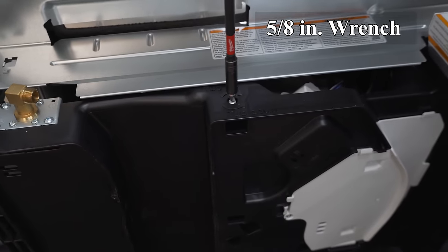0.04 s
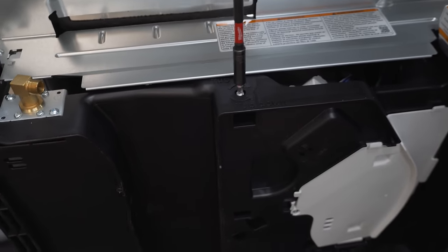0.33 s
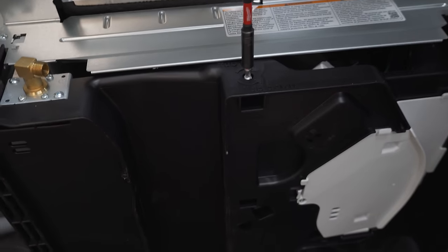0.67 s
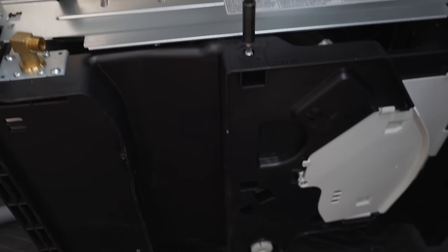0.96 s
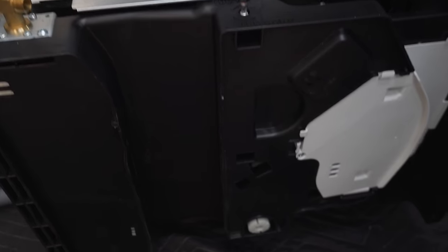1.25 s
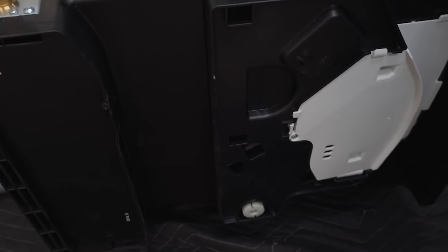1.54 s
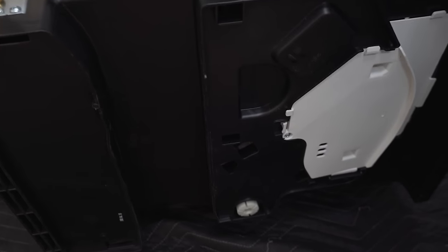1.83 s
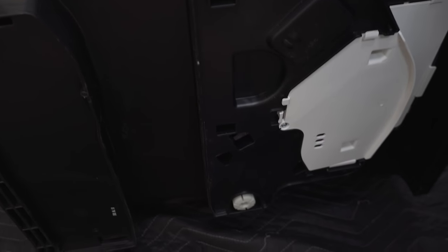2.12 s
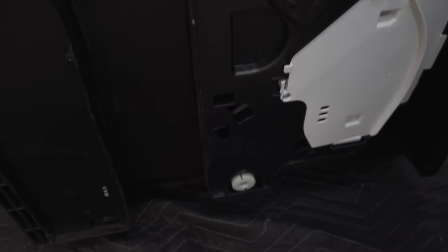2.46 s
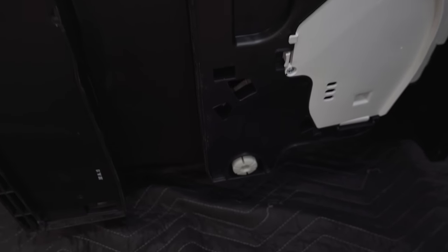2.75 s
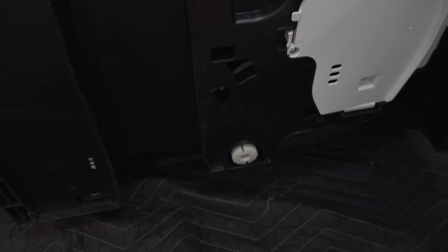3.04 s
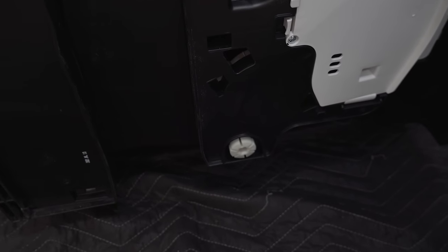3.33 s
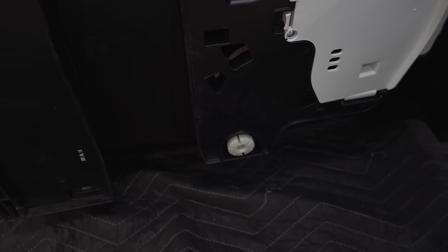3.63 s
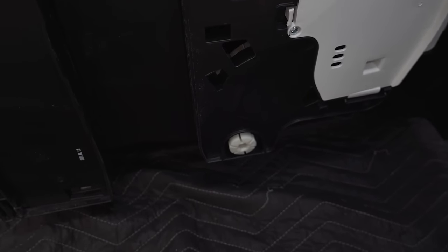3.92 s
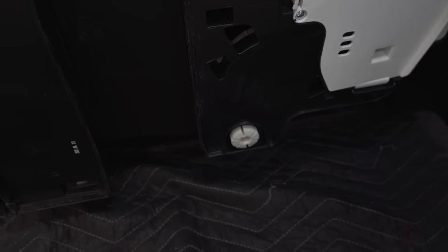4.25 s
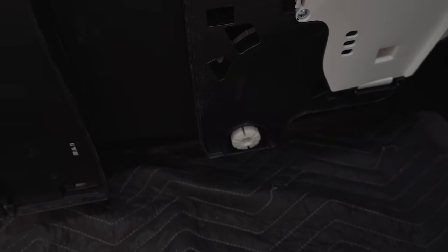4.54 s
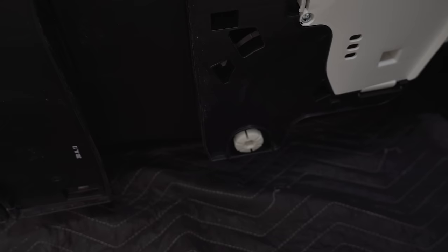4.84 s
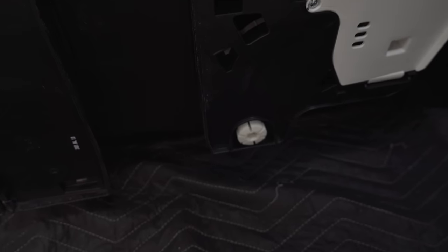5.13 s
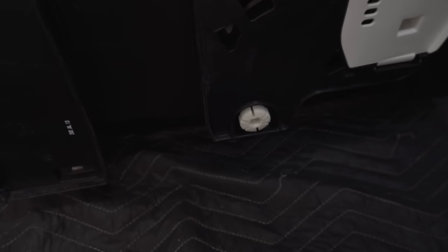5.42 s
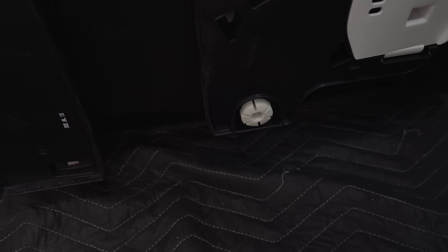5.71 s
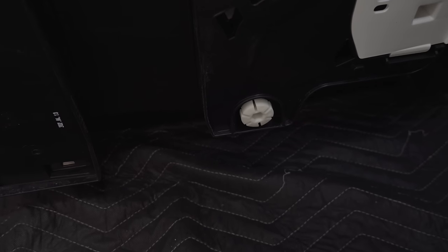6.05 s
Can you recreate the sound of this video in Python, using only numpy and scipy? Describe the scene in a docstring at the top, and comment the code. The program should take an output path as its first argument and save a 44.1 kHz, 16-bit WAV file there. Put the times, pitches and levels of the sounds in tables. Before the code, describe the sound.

Irregular plastic knocks, clacks and small steel ticks as a screwdriver turns a stiff adjusting screw, gears twice slipping with a rasp, over low hum.

```python
"""In a quiet, humming room, a driver turns the levelling screw of a dishwasher, close by.
Impacts excite resonators: the steel bit ticks in the screw head and its shaft rings, while the
plastic drive knocks, ratchets and clacks as it binds and slips. Twice the gears jump and spin in a
rasping run of friction noise. The hollow base and the cabinet ring on after the blows."""
import sys
import numpy as np
from scipy import signal
from scipy.fft import rfft, irfft, next_fast_len
from scipy.io import wavfile
from scipy.ndimage import uniform_filter1d

SR = 44100
rng = np.random.default_rng(int(sys.argv[2]) if len(sys.argv) > 2 else 0)


def wrap_up_sound(samples):
    """Save the sound to the file named by the first command line argument, as 16-bit audio."""
    columns = np.atleast_2d(samples).T
    # keep every value between -1 and 1, then stretch to whole-number steps
    tamed = np.clip(columns, -1, 1)
    steps = np.round(tamed * 32767).astype(np.int16)
    wavfile.write(sys.argv[1], SR, steps)


N = 272538
TIME = np.arange(N) / SR
AGE = TIME[:SR * 3 // 4]   # time since a contact

# Levels are relative within each source.
# the shaft takes up its play: t/s, level/dB, judder length/s, hardness/dB
KNOCKS = [(0.127, -26.5, 0.0066, 0), (1.02, -9.5, 0.057, 7), (1.676, -6.5, .115, 12),
          (1.98, -18.5, .035, -20), (2.224, -21.5, .005, 9), (2.665, -5, .016, 13), (4.106, -21.5, .005, 9),
          (4.704, -22.5, .005, 11), (5.242, -12.5, .005, -31)]
# the drive slips under load: t/s, level/dB, rise/s, treble/dB, cabinet ring/dB
CLACKS = [(0.71, -31, 0.0021, 0, -11), (3.242, -24, 0.0061, 1, -4.5), (3.256, -15.5, 0.0043, -2, -10.5),
          (3.608, -29, 0.0022, -1, -7.5), (4.245, -23, 0.0018, -23, -8), (4.277, -8.5, 0.0019, -0.5, -13),
          (4.339, -10.5, 0.0033, -2.5, -15.5), (4.444, -18, 0.0018, -8, -18),
          (4.679, -22, 0.0015, 20.5, -13), (4.741, -8.5, 0.0064, -2.5, -10.5),
          (4.766, -10, 0.0028, -3.5, -13), (4.957, -20.5, .0041, -15, -7.5), (5.214, -7.5, 0.0022, 4, -11),
          (5.381, -22.5, 0.0023, -6, -14), (5.424, -6, 0.0033, 1, -9.5), (5.605, -8, 0.0029, -0.5, -6),
          (5.761, -14, 0.0017, -6, -3.5)]
# gear teeth jump: t/s, level/dB, skipping length/s, treble/dB
SNAPS = [(2.695, -1.5, .005, 6), (2.727, -10, .005, 16), (5.816, -7, .005, -18), (5.829, -0.5, .005, 0),
         (5.861, -3, 0.192, 3.5)]
# the gears spin: t/s, time under power/s, bass/dB, middle/dB, rasp/dB
GEAR_RUNS = [(2.675, .18, -20.5, -17, -22.5), (5.771, 0.34, -18.5, -20.5, -29)]
# the bit rattles in the screw head: t/s, length/s, tick/dB, shaft ring/dB
CLINKS = [(0.126, 0.028, -31.5, -44), (0.186, .012, -41, -43.5), (1.019, 0.025, -23.5, -38.5),
          (1.362, 0.031, -26, -38), (1.683, 0.06, -12.5, -36), (1.772, 0.028, -19, -32.5),
          (1.884, 0.033, -15.5, -45), (2.208, 0.023, -16, -30), (2.654, 0.061, -18.5, -32),
          (5.785, 0.022, -9.5, -25.5)]
# the base flexes under hard pushes: t/s, level/dB, f/Hz
THUMPS = [(2.83, -20, 63), (3.255, -19, 165), (4.102, -24, 210), (4.278, -15, 165), (4.346, -16.5, 163),
          (4.698, -14.5, 76), (4.763, -14, 257), (6.059, -13, 49.6), (6.098, -14, 175)]
# slow drift of the background: t/s, rumble/dB, hiss/dB, hum/dB
ROOM_LEVELS = [(0.0, -34.5, -58.5, -36), (1.3, -33.5, -56, -33), (1.8, -32, -54.5, -37.5),
               (2.6, -32.5, -56.5, -34), (3.3, -36.5, -60.5, -38), (4.0, -35.5, -57.5, -37),
               (5.2, -31.5, -56.5, -35.5)]
# a single contact: delay/s, gain
ONCE = [(0, 1)]
# resonances of the plastic base: f/Hz, half-width/Hz, strength/dB
BASE_MODES = [(179, 3.7, 8), (294, 28, 3), (333.5, 14, 5), (370, 4.4, 6), (432, 14, 4), (468.4, 42, 3.5),
              (529, 20, 7), (619, 9.2, 7.5), (682, 10, 6.5), (782.7, 18, 10.5), (978, 100, 2),
              (1088, 6, 10), (1295, 2.4, 9), (1480, 11, 9), (1590, 5, -8), (1886, 24, 4.5), (2392, 21, 6),
              (2640, 29, 6)]
# modes of the steel shaft: f/Hz, level/dB, t60/s
SHAFT_MODES = [(5440, -5.5, 0.39), (5410, 1.5, 0.14), (6220, -18, 0.15), (11680, -22, 0.37)]
# spectral envelopes of the sources: f/Hz, density level/dB
KNOCK_SPECTRUM = [(130, -21.5), (220, -16), (320, -0.5), (450, -1), (620, -7), (890, -17.5), (1340, -17.5),
                  (1650, -29.5), (2000, -33), (5000, -52), (11000, -83)]
CLACK_SPECTRUM = [(71, -65), (120, -4.5), (372, 0), (1630, -1.5), (3230, -11.5), (3870, -15.5), (5140, -22),
                  (6290, -31.5), (8520, -33.5), (10400, -44), (15000, -47)]
SNAP_SPECTRUM = [(120, -11), (200, -2), (957, 3), (1950, 1.5), (4750, -11.5), (6350, -23), (8050, -18.5),
                 (8660, -23.5), (15500, -34)]
CABINET_SPECTRUM = [(88, -21), (150, -24.5), (331, 4.5), (525, -5), (991, -4), (1570, -15), (1950, -9),
                    (2860, -21.5), (3400, -21.5), (4720, -30), (15000, -52.5)]
GEAR_SPECTRUM = [(71, -52), (120, -22), (271, -13.5), (335, -2), (400, -11.5), (780, -11), (1950, -12.5),
                 (3300, -14.5), (15500, -48)]
TICK_SPECTRUM = [(530, -5), (900, 2.5), (2280, 1.5), (4900, -9.5), (5450, -7.5), (5990, -12), (9820, -19.5),
                 (11900, -28), (15000, -31)]
RATCHET_SPECTRUM = [(820, -6), (1400, -2), (2000, -1.5), (2290, -7), (4040, -12.5), (5090, -10.5),
                    (6230, -18), (14000, -43)]
RUB_SPECTRUM = [(1500, -19), (4000, 3), (7000, -1), (10000, -6), (15000, -15)]
ROOM_SPECTRUM = [(20, -3), (42, -9), (59, -1.5), (110, -5.5), (160, -4), (225, -1.5), (324, -12),
                 (550, -23.5), (1100, -29), (1700, -30), (3500, -41), (8000, -47.5), (11000, -53.5),
                 (15500, -58)]
# stereo width of the drive and of the room: f/Hz, side re mid/dB
DRIVE_WIDTH = [(60, -42), (110, -30), (200, -22), (380, -18.5), (700, -13), (1290, -10.5), (2380, -7),
               (4400, -6), (8120, -5.5), (15000, -5)]
ROOM_WIDTH = [(60, -44), (110, -38), (200, -27.5), (380, -9.5), (700, -6.5), (1290, -3), (2380, 0.5),
              (4400, 2.5), (8120, -0.5), (15000, 0.5)]


def knocks():
    """Backlash: the shaft knocks as its play closes, then judders on with softer blows."""
    rows = []
    for s, db, length_s, hardness_db in KNOCKS:
        judder = rattle(length_s, per_s=63.8, fade_db=3.5, unevenness=0.65)
        bass_db = -0.28 * hardness_db   # a harder knock has less bass
        rows.append((s, db, bass_db, hardness_db, 0.0032, -8, ONCE))
        rows.append((s, db - 3.5, 0, -2, 0.0033, -6, judder))
    return blows(rows, KNOCK_SPECTRUM, KNOCK_SPECTRUM, tilt_hz=(350, 650, 1600), base_db=-1.5,
                 ring_t60=0.44, ring_tilt_share=0.45, build_s=0.0058, lead_s=0.003027, touch_db=-5)


def clacks():
    """Stick-slip: the drive binds and lets go in single clacks; the harder ones are thinner."""
    pivot_db, thinning = -17.5, 0.37   # bass lost per dB above the pivot
    rows = [(s, db, thinning * (pivot_db - db), treble_db, rise_s, ring_db, ONCE)
            for s, db, rise_s, treble_db, ring_db in CLACKS]
    return blows(rows, CLACK_SPECTRUM, CABINET_SPECTRUM, tilt_hz=(450, 1500, 6000), base_db=-1,
                 ring_t60=0.64, ring_tilt_share=0.79, build_s=0.0014, lead_s=.003, touch_db=-19)


def snaps():
    """Periodic impact: a gear tooth jumps with a snap, then once a turn while the skipping lasts."""
    turns_per_s, bass_db, ring_db = 21.3, 4, -22
    rows = []
    for s, db, length_s, treble_db in SNAPS:
        skips = rattle(length_s, turns_per_s, fade_db=4.5, unevenness=.06)
        rows.append((s, db, bass_db, treble_db, .0019, ring_db, ONCE))
        rows.append((s, db + 0.5, bass_db, treble_db, 0.0026, ring_db, skips))
    return blows(rows, SNAP_SPECTRUM, CABINET_SPECTRUM, tilt_hz=(450, 1500, 6000), base_db=-10,
                 ring_t60=0.9, ring_tilt_share=0.13, build_s=0.0057, lead_s=.011, touch_db=-7.5)


def blows(rows, spectrum, ring_spectrum, tilt_hz, base_db,
          ring_t60, ring_tilt_share, build_s, lead_s, touch_db):
    """Impact excitation: plastic crunches briefly, and the cabinet's dense modes decay as noise."""
    out = np.zeros((2, N))
    ringing = dying(ring_t60) * (1 - np.exp(-AGE / build_s))   # reflections build up in the cabinet
    for s, db, bass_db, treble_db, rise_s, ring_db, contacts in rows:
        contacts = touched(contacts, lead_s, touch_db)
        tilt_db = np.array([bass_db, 0, treble_db])
        rise = np.minimum(AGE / rise_s, 40)
        force = repeated(rise * np.exp(1 - rise), contacts)[:SR // 3]
        crunch = noise(force, side_db=-0.5)
        crunch = coloured(crunch, spectrum, DRIVE_WIDTH, np.c_[tilt_hz, tilt_db], base_db)
        add(out, s - lead_s, from_db(db) * crunch * rms(force) / rms(crunch))
        ring = noise(repeated(ringing, contacts), side_db=5.5)   # reflected sound is wider
        ring_tilt = np.c_[tilt_hz, tilt_db * ring_tilt_share]
        ring = coloured(ring, ring_spectrum, DRIVE_WIDTH, ring_tilt, base_db)
        add(out, s - lead_s, from_db(db + ring_db) * ring)
    return out


def gear_runs(teeth_per_s=170):
    """Modulated friction: uneven tooth pulses shake the base, and the sound dulls as they run down."""
    tooth_phase = np.cumsum(teeth_per_s * (1 + .15 * wander(.01))) / SR % 1
    load = 1 + 0.52 * np.exp(-4 * tooth_phase)
    load *= from_db(0.96 * wander(0.0064))   # no two teeth bite alike
    scrape = coloured(noise(load, side_db=5.5), GEAR_SPECTRUM, DRIVE_WIDTH, base_db=-1)
    body, treble = split(scrape, hz=3630)
    bass, middle = split(body, hz=833)
    rasp, fizz = split(treble, hz=10800)
    gains = np.zeros((3, N))
    for s, length_s, *levels in GEAR_RUNS:
        for gain, db, attack_s in zip(gains, levels, (0.11, 0.067, 0.039)):
            gain += from_db(db) * swell(TIME, s, attack_s, length_s, release_db_per_s=97.5)
    bass_gain, middle_gain, rasp_gain = gains
    fizz_gain = rasp_gain ** 2 / rasp_gain.max()   # the top band fades twice as fast
    return (from_db(1.1) * (bass * bass_gain + middle * middle_gain)
            + from_db(3.5) * rasp * rasp_gain + from_db(-12) * fizz * fizz_gain)


def steel_bit(lead_s=.016, detune=.004):
    """Free vibration: each tick of steel on steel excites the shaft, whose pitch shifts with the grip."""
    out, ringing = np.zeros((2, 2, N))
    tick = dying(t60=0.0095) + from_db(-11) * dying(t60=0.31)   # contact and faint echo
    for s, length_s, db, ring_db in CLINKS:
        rebounds = rattle(length_s, per_s=68, fade_db=14.5, unevenness=.2, count=4) + [lead_s, 0]
        contacts = np.vstack([touched(ONCE, lead_s, touch_db=-11.5), rebounds])
        ticks = noise(repeated(tick, contacts))
        add(out, s - lead_s, from_db(db - 4.5) * coloured(ticks, TICK_SPECTRUM, DRIVE_WIDTH))
        for delay, gain in contacts:
            for hz, mode_db, t60 in SHAFT_MODES:
                pitch = hz * (1 + detune * rng.standard_normal())
                mode = np.sin(2 * np.pi * (pitch * AGE + rng.random((2, 1)))) * dying(t60)
                add(ringing, s - lead_s + delay, gain * from_db(ring_db + mode_db + 3.5) * mode)
    grain = 1 + 0.19 * wander(0.003)
    return out + ringing * grain


def base_thumps(t60=0.11, rise_s=0.0032):
    """Damped oscillation: the broad panel of the base swings briefly after a hard push."""
    out = np.zeros((2, N))
    envelope = dying(t60) * (1 - np.exp(-AGE / rise_s))
    for s, db, hz in THUMPS:
        swing = np.sin(2 * np.pi * hz * AGE) * envelope
        add(out, s, from_db(db) * swing[None])
    return out


def ratchet(start_s=3.903, teeth_per_s=64.8):
    """An impulse train: lightly loaded teeth click past at an even pace, each with a faint echo."""
    out = np.zeros((2, N))
    click = dying(t60=0.0065) + from_db(-18) * dying(t60=.35)
    for s in start_s + np.arange(20) / teeth_per_s:
        strength = swell(s, start_s, attack_s=0.048, length_s=.225, release_db_per_s=250)
        add(out, s, strength * noise(click))
    return coloured(out, RATCHET_SPECTRUM, DRIVE_WIDTH)


def rub():
    """Sliding friction: smooth plastic faces hiss faintly in proportion to the pressure."""
    pressure = swell(TIME, start_s=4.36, attack_s=0.21, length_s=0.23, release_db_per_s=115)
    return coloured(noise(pressure), RUB_SPECTRUM, DRIVE_WIDTH)


def room(hum_hz=70.9):
    """Ambient noise: broadband rumble and hiss, with a low hum that wavers in pitch and level."""
    air = coloured(noise(np.ones(N)), ROOM_SPECTRUM, ROOM_WIDTH)
    rumble, hiss = split(air, hz=520)
    times, *levels = np.transpose(ROOM_LEVELS)
    rumble_gain, hiss_gain, hum_gain = [from_db(np.interp(TIME, times, db)) for db in levels]
    pitch = hum_hz + 1.04 * wander(0.13)
    hum = np.sqrt(2) * np.sin(2 * np.pi * np.cumsum(pitch) / SR)
    hum *= from_db(1.2 * wander(.3))
    return (from_db(-1.37) * rumble * rumble_gain + from_db(13.5) * hiss * hiss_gain
            + from_db(-5) * hum * hum_gain)


def rattle(length_s, per_s, fade_db, unevenness, count=9):
    """Repeated contact: uneven, fading impacts follow a first one; rows of delay/s, gain."""
    delay = (np.arange(1, count + 1) + unevenness * rng.uniform(-0.73, 1, count)) / per_s
    still_going = np.clip((length_s - delay) * per_s + .5, 0, 1)
    fade = from_db(-fade_db * np.minimum(delay / length_s, 1))
    return np.c_[delay, still_going * fade]


def touched(contacts, lead_s, touch_db):
    """Two-stage contact: a light touch precedes each impact; delays count from the first touch."""
    return np.vstack([np.multiply(contacts, [1, from_db(touch_db)]), np.add(contacts, [lead_s, 0])])


def repeated(shape, contacts):
    """Incoherent summation: the powers of several contacts add into one envelope."""
    power = np.zeros((1, len(AGE)))
    for delay, gain in contacts:
        add(power, delay, (gain * shape[None]) ** 2)
    return np.sqrt(power[0])


def coloured(mid_side, spectrum, width, tilt=None, base_db=None):
    """Source-filter model: a spectrum, tilt and base resonances shape mid and side; gives left, right."""
    length = mid_side.shape[1]
    size = 2 * next_fast_len(length // 2 + 1024)
    hz = np.maximum(np.arange(size // 2 + 1) * SR / size, 1)
    power = gain_at(spectrum, hz) ** 2
    if base_db is not None:
        lifts = [from_db(db + base_db) / (1 + ((hz - centre) / half_width) ** 2)
                 for centre, half_width, db in BASE_MODES]
        power *= 1 + np.sum(np.square(lifts), axis=0)
    if tilt is not None:
        power *= gain_at(tilt, hz) ** 2
    cepstrum = irfft(np.log(power / power.mean() + 1e-20) / 2)   # unit power gain
    cepstrum[1:size // 2] *= 2   # minimum phase: nothing sounds before its cause
    cepstrum[size // 2 + 1:] = 0
    mid, side = rfft(mid_side, size) * np.exp(rfft(cepstrum))
    side *= gain_at(width, hz)
    return irfft([mid + side, mid - side])[:, :length]


def split(x, hz):
    """Crossover: the bands below and above a frequency, each of rms 1."""
    filters = [signal.butter(3, hz, kind, fs=SR, output="sos") for kind in ("low", "high")]
    bands = [signal.sosfilt(sos, x) for sos in filters]
    return [band / rms(band) for band in bands]


def noise(envelope, side_db=0):
    """Uncorrelated mid and side noise under one envelope."""
    return rng.standard_normal((2, len(envelope))) * envelope * from_db([[0], [side_db]])


def wander(seconds):
    """Smoothed noise: a random fluctuation of rms 1."""
    slow = uniform_filter1d(rng.standard_normal(N), size=int(seconds * SR), mode="wrap")
    return slow / rms(slow)


def swell(t, start_s, attack_s, length_s, release_db_per_s):
    """Linear attack, a hold until the length is over, then exponential decay."""
    age = t - start_s
    return np.clip(age / attack_s, 0, 1) * from_db(-release_db_per_s * np.maximum(age - length_s, 0))


def dying(t60):
    """Exponential decay by 60 dB in t60 seconds."""
    return np.exp(-np.log(1000) * AGE / t60)


def gain_at(points, hz):
    """Gain from rows of f/Hz, level/dB, interpolated in log frequency."""
    f, db = np.transpose(points)
    return from_db(np.interp(np.log(hz), np.log(f), db))


def add(out, s, sound):
    """Superpose a sound at time s."""
    part = out[:, max(round(s * SR), 0):][:, :sound.shape[1]]
    part += sound[:, :part.shape[1]]


def from_db(db):
    """Decibels to amplitude ratio."""
    return 10 ** (np.asarray(db) / 20)


def rms(x):
    """Root mean square."""
    return np.sqrt(np.mean(x ** 2) + 1e-20)


def scene():
    """Superposition: all parts of the drive sound over the room."""
    plastic = from_db(-5.5) * knocks() + from_db(-3.5) * clacks() + from_db(-6) * snaps()
    steel = steel_bit()
    clicking = from_db(-28.5) * ratchet()
    return plastic + steel + clicking + base_thumps() + gear_runs() + room() + from_db(-52.5) * rub()


def record(dry, cutoff_hz=15900):
    """Soft saturation rounds the highest peaks, and a steep low-pass limits the bandwidth."""
    return signal.sosfilt(signal.ellip(10, .1, 80, cutoff_hz, fs=SR, output="sos"), np.tanh(dry))


dry = scene()
out = record(dry)
wrap_up_sound(out)
```